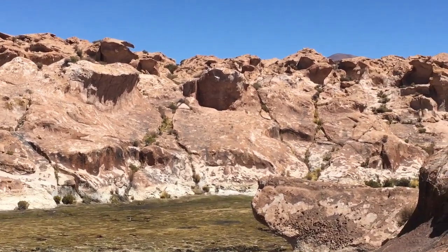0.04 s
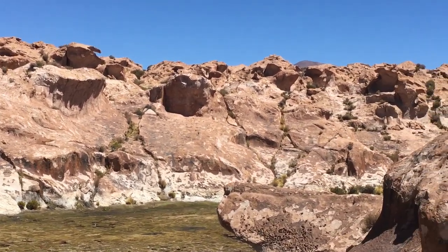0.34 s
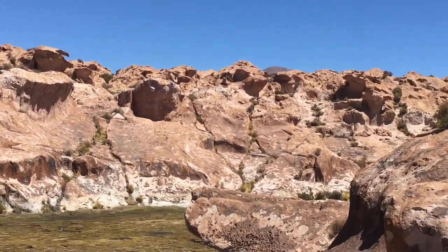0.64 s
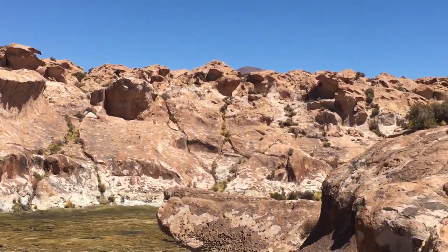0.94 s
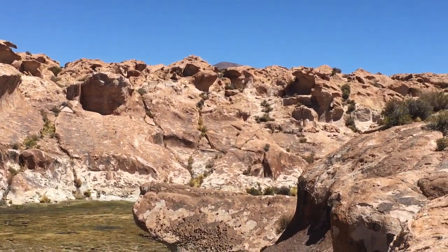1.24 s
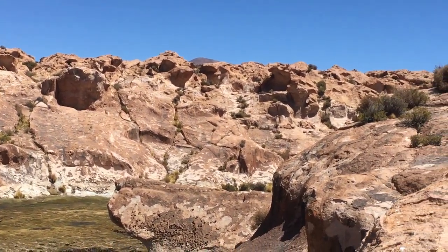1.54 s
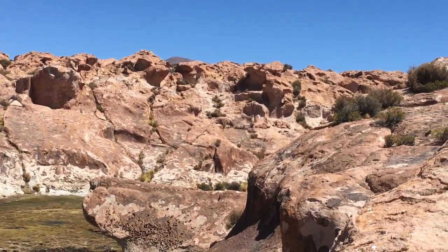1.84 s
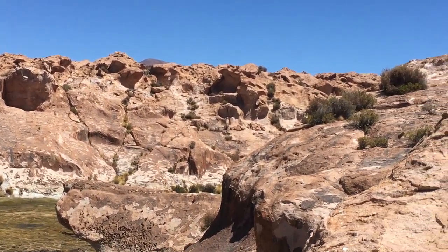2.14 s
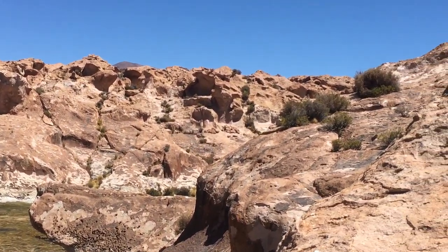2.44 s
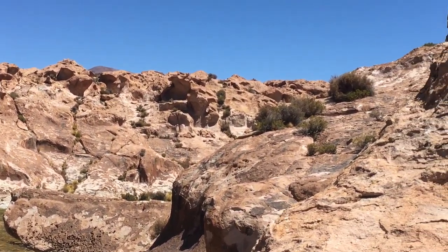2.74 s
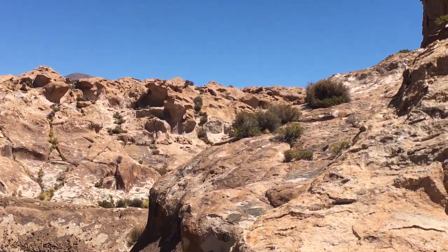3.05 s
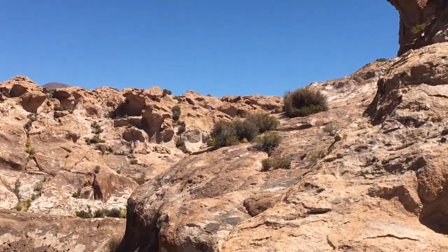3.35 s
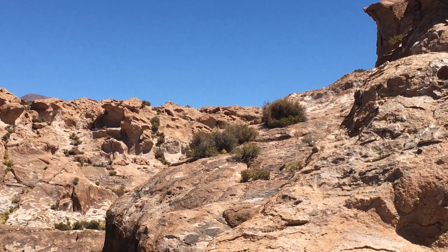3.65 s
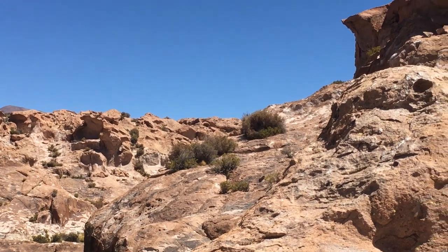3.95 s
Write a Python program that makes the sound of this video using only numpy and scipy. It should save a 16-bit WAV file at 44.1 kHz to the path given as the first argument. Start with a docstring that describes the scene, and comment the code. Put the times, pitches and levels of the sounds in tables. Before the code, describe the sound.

Gusty wind rumbles and flutters directly on the microphone for all four seconds, in rapid, uneven buffets. Harder hits rasp or crack around 0.9, 2, 2.7 and 3.9 seconds. A small, distant bird trills very faintly from 0.4 to 1.8 seconds, then chirps until 2.3. Two faint scuffs come in the first half second, and tiny grit ticks near 1 and 3.2 seconds, over soft hiss.

```python
"""An open rocky canyon, with gusty wind on a bare microphone.
The airflow rumbles and flutters; single eddies strike as short buffets, the hard ones with a
tearing rasp, and the flow cracks as it tears off the microphone port. Far off a small bird slurs,
trills and chips, scattered by the rock walls. Two faint scuffs and a few ticks of grit lie close by,
over an airy rustle, still air and microphone hiss."""
import sys
import numpy as np
from scipy import signal
from scipy.fft import rfft, irfft
from scipy.io import wavfile
from scipy.ndimage import uniform_filter1d

SR = 44100
rng = np.random.default_rng(int(sys.argv[2]) if len(sys.argv) > 2 else 0)


def file_out(sig):
    """Save sig as 16-bit WAV at sys.argv[1]."""
    # one column per channel
    cols = np.atleast_2d(sig).T
    # limit, then scale
    lim = np.clip(cols, -1, 1)
    pcm = np.round(lim * 32767).astype(np.int16)
    wavfile.write(sys.argv[1], SR, pcm)


N = 176400
T = np.arange(N) / SR


def wind(usual_db=-45, fray_growth=2.1):
    """Turbulence on the bare microphone: deep thump, fluttering body, a rasp that fast air raises."""
    # Airflow between buffets: t/s, rumble level/dB, flutter level/dB (levels before the trims below)
    airflow = [(0.0, -54, -62), (0.07, -36, -50), (0.2, -48, -50), (0.35, -40, -47), (0.45, -35, -52),
               (0.58, -46, -57), (0.7, -33, -47), (0.87, -30, -35), (0.94, -41, -55), (1.1, -33, -42),
               (1.25, -36, -48), (1.39, -38, -44), (1.49, -34, -43), (1.56, -32, -43), (1.68, -32, -38),
               (1.8, -38, -52), (1.92, -45, -34), (2.08, -55, -50), (2.38, -36, -46), (2.58, -40, -53),
               (2.7, -32, -47), (2.88, -37, -43), (2.99, -44, -56), (3.1, -34, -49), (3.24, -44, -54),
               (3.44, -36, -39), (3.53, -31, -42), (3.66, -35, -47), (3.86, -43, -52), (3.95, -29, -45),
               (4.0, -26, -37)]
    # Eddies that strike: peak t/s, nominal length/s, thump, body and rasp level/dB (before trims)
    buffets = [(0.123, 0.015, -39, -40, -58), (0.164, 0.012, -37, -37, -55), (0.2, 0.023, -30, -33, -59),
               (0.238, 0.014, -50, -34, -50), (0.296, 0.015, -27, -26, -46), (0.414, 0.027, -39, -31, -61),
               (0.489, 0.023, -46, -38, -62), (0.64, 0.012, -31, -35, -78), (0.672, 0.018, -30, -35, -69),
               (0.736, 0.019, -30, -24, -42), (0.756, 0.012, -27, -29, -59), (0.825, 0.017, -38, -31, -50),
               (0.86, 0.015, -41, -24, -34), (1.003, 0.019, -27, -28, -35), (1.039, 0.019, -35, -28, -50),
               (1.113, 0.017, -30, -29, -47), (1.159, 0.018, -25, -25, -42), (1.395, 0.019, -51, -39, -50),
               (1.47, 0.024, -27, -28, -47), (1.495, 0.016, -32, -27, -52), (1.63, 0.012, -39, -29, -42),
               (1.653, 0.012, -24, -36, -57), (1.694, 0.012, -23, -29, -42), (1.746, 0.013, -51, -33, -50),
               (1.885, 0.018, -28, -31, -45), (1.929, 0.012, -25, -29, -41), (1.979, 0.012, -46, -30, -53),
               (2.002, 0.02, -20, -21, -41), (2.053, 0.017, -27, -40, -59), (2.125, 0.017, -33, -33, -45),
               (2.184, 0.022, -33, -35, -51), (2.248, 0.025, -30, -31, -53), (2.32, 0.03, -26, -33, -48),
               (2.473, 0.021, -33, -27, -50), (2.528, 0.018, -39, -34, -40), (2.634, 0.012, -49, -29, -36),
               (2.657, 0.023, -30, -21, -29), (2.71, 0.015, -41, -26, -59), (2.804, 0.012, -30, -25, -38),
               (2.85, 0.024, -50, -23, -43), (2.937, 0.024, -31, -32, -52), (3.032, 0.018, -55, -38, -47),
               (3.083, 0.022, -51, -32, -51), (3.174, 0.03, -36, -31, -41), (3.203, 0.014, -53, -30, -39),
               (3.239, 0.033, -34, -27, -44), (3.258, 0.013, -25, -30, -49), (3.333, 0.015, -25, -23, -42),
               (3.4, 0.012, -29, -34, -52), (3.432, 0.012, -32, -32, -53), (3.505, 0.012, -22, -40, -51),
               (3.533, 0.012, -23, -35, -41), (3.592, 0.022, -39, -32, -52), (3.691, 0.023, -29, -31, -52),
               (3.794, 0.026, -30, -31, -44), (3.839, 0.021, -34, -28, -47), (3.901, 0.022, -27, -21, -37),
               (3.926, 0.02, -28, -28, -43), (3.95, 0.019, -25, -22, -31)]
    # Spectra of the three parts: f/Hz, relative level/dB
    thump_colour = [(15, -36), (25, -27.5), (40, -10.5), (52, -1), (65, 0.5), (85, -4), (115, -7),
                    (150, -12.5), (300, -59), (900, -120), (3000, -200)]
    body_colour = [(60, -29.5), (110, -8), (145, 3), (200, -1), (300, -8), (380, -15), (500, -29),
                   (800, -64), (1500, -110), (5000, -200)]
    rasp_colour = [(200, -21.5), (350, -3), (450, 1.5), (570, -1.5), (700, -10), (850, -19), (1100, -41),
                   (1600, -64), (3000, -110), (9000, -200)]
    rumble_db, flutter_db = curve(airflow)
    fray_db = usual_db + fray_growth * (flutter_db - usual_db)  # grows faster than the flutter
    swing = eddies()
    rumble = amp(rumble_db + 1 + 3.5 * swing)
    flutter = amp(flutter_db - 0.5 + 4 * swing)
    fray = amp(fray_db - 27.5 + 7.5 * swing)
    # Buffets add their power to the running flow; the higher the band, the shorter the blow.
    times, lengths, thump_db, body_db, rasp_db = np.transpose(buffets)
    thump = np.sqrt(rumble ** 2 + strikes(times, lengths * 1.265, thump_db + 3.5))
    body = np.sqrt(flutter ** 2 + strikes(times, lengths * 0.77, body_db - 0.5))
    rasp = np.sqrt(fray ** 2 + strikes(times, lengths * 0.49, rasp_db + 1))
    parts = (thump, thump_colour), (body, body_colour), (rasp, rasp_colour)
    return sum(level * noise(colour, passes=4) for level, colour in parts)


def eddies(corner_hz=32.4):
    """Quick random swings of the air speed, softly limited."""
    hz = np.fft.rfftfreq(N, 1 / SR)
    band = hz / (hz + corner_hz / 10) / (1 + (hz / corner_hz) ** 2)
    swing = unit(irfft(rfft(rng.standard_normal(N)) * band, N))
    return 2 * np.tanh(swing / 2)


def strikes(times, widths_s, levels_db):
    """Summed power of short blows of air, each a smooth swell and fall."""
    power = np.zeros(N)
    for s, width, db in zip(times, widths_s, levels_db):
        near = slice(max(0, int((s - 2 * width) * SR)), int((s + 2 * width) * SR))
        offset = (T[near] - s) / width
        swell = np.exp(-2 * offset ** 2) * np.cos(np.pi * offset / 4)
        power[near] += (amp(db) * swell) ** 2
    return power


def port_cracks(usual_width_s=0.0038, usual_db=-52.5, doubling_db=16):
    """The flow tears off the microphone port in brief cracks; a harder one lasts longer."""
    # Cracks: t/s, level/dB before the trim
    cracks = [(0.295, -57), (0.853, -46), (0.862, -50), (1.003, -45), (1.155, -54), (1.493, -58),
              (1.634, -57), (1.688, -57), (1.925, -49), (2.528, -54), (2.651, -39), (2.801, -55),
              (3.171, -57), (3.199, -50), (3.243, -55), (3.803, -56), (3.833, -55), (3.896, -47),
              (3.937, -57), (3.951, -44)]
    # Their spectrum: f/Hz, relative level/dB
    colour = [(250, -14), (450, 0), (700, -1), (950, -1.5), (1150, -11.5), (1400, -20.5), (2000, -36.5),
              (3000, -50), (9000, -120)]
    times, db = np.transpose(cracks)
    widths_s = usual_width_s * 2 ** ((db - usual_db) / doubling_db)
    return np.sqrt(strikes(times, widths_s, db + 2.5)) * noise(colour, passes=4)


def bird(trill_start_s=0.489, step_s=0.0619, chips=22, chip_s=0.014, fall=0.09):
    """A small bird far off: slurred notes and a rising trill of falling chips."""
    # Slurs: t/s, length/s, start, middle and end f/Hz, level/dB
    notes = [(.376, .045, 4450, 5050, 4900, -79), (.41, .06, 4950, 4800, 4600, -77),
             (.455, .08, 3650, 3450, 3000, -84), (1.914, .026, 8200, 7200, 6300, -79),
             (1.927, .022, 8100, 7200, 6300, -78), (2.19, .045, 5030, 4930, 4800, -83),
             (2.245, .042, 4800, 4660, 4480, -80)]
    # Course of the trill: t/s, f/Hz, level/dB
    trill = [(.5, 3050, -83), (.62, 3150, -82), (.87, 3400, -84), (1, 3650, -79), (1.06, 3850, -78),
             (1.3, 3950, -83), (1.6, 3900, -82), (1.74, 4000, -77), (1.8, 4000, -79)]
    song = np.zeros(N)
    for s, *note in notes:
        add(song, s, whistle(*note))
    times, pitch, level = np.transpose(trill)
    for s in trill_start_s + step_s * np.arange(chips):
        hz = np.interp(s, times, pitch)
        db = np.interp(s, times, level)
        add(song, s, whistle(chip_s, hz * (1 + fall), hz, hz * (1 - fall), db))
    return song


def whistle(length_s, start_hz, middle_hz, end_hz, db, waver_share=0.009, waver_s=0.002):
    """One gliding, slightly unsteady bird note."""
    u = np.linspace(0, 1, int(length_s * SR))
    waver = unit(uniform_filter1d(rng.standard_normal(N // 20), int(waver_s * SR)))[:len(u)]
    glide = np.polyval(np.polyfit([0, .5, 1], [start_hz, middle_hz, end_hz], 2), u)
    hz = glide * (1 + waver_share * waver)
    envelope = amp(db) * np.sqrt(2) * np.sin(np.pi * u)
    return envelope * np.sin(2 * np.pi * np.cumsum(hz) / SR)


def rock_walls(sound, echo_db=-7.5, t60_s=0.5):
    """The direct sound plus the diffuse tail that the canyon walls scatter back."""
    tail = rng.standard_normal(SR) * np.exp(-np.log(1000) * T[:SR] / t60_s)
    return sound + amp(echo_db) * signal.fftconvolve(sound, tail / np.linalg.norm(tail))[:N]


def scuffs_and_grit():
    """Friction close to the microphone: soft scuffs and small, sharp ticks of grit."""
    # Onsets: t/s, level/dB
    scuffs = [(.002, -63.5), (.392, -65.5)]
    ticks = [(.971, -71), (1.184, -74), (3.198, -69)]
    # Their spectra: f/Hz, relative level/dB
    scuff_colour = [(300, -10.5), (1100, -12.5), (2000, -14), (2850, -17), (3300, -26), (6000, -27),
                    (12000, -38)]
    tick_colour = [(400, 0), (1200, 0.5), (3500, 1), (6000, -10), (9000, -16)]
    return rubs(scuffs, scuff_colour, rise_s=0.013) + rubs(ticks, tick_colour, rise_s=0.0015)


def rubs(events, colour, rise_s):
    """Short bursts of friction noise that swell for rise_s and die away."""
    ages = [(np.maximum(T - s, 0) / rise_s, db) for s, db in events]
    return noise(colour) * sum(amp(db) * age * np.exp(1 - age) for age, db in ages)


def ambience(air_db=-75):
    """Steady still air and microphone hiss, with a faint rustle that comes and goes all around."""
    # Spectra of the air with the hiss, and of the rustle: f/Hz, relative level/dB
    air_colour = [(100, 4.5), (600, 6), (1200, -1), (2000, -3), (3300, -3), (4300, -3.5), (4950, -7),
                  (5600, -2.5), (6800, -3), (7800, -5.5), (9300, -2), (10500, -6), (11600, -1.5),
                  (15500, -1.5)]
    rustle_colour = [(400, -5.5), (1200, -1), (2500, -5), (3500, -7), (4500, -14.5), (12000, -35.5)]
    # Course of the rustle: t/s, level/dB
    rustle_level = [(0, -79.5), (.6, -81.5), (.73, -81), (.95, -87.5), (1.2, -84), (1.48, -80), (1.75, -81),
                    (1.9, -83.5), (2.2, -86.5), (2.45, -80), (2.8, -88), (3.2, -81), (3.7, -88.5), (4, -85)]
    air = amp(air_db) * noise(air_colour)
    rustle = amp(curve(rustle_level)[0]) * noise(rustle_colour)
    return air + rustle


def noise(colour, passes=0):
    """Coloured noise at rms 1; each pass evens out its loudness and keeps its colour."""
    hz, db = np.transpose(colour)
    gain = amp(np.interp(np.log(np.fft.rfftfreq(N, 1 / SR) + 1), np.log(hz), db))
    x = irfft(gain * rfft(rng.standard_normal(N)), N)
    for _ in range(passes):
        even = np.cos(np.angle(signal.hilbert(x)))
        x = irfft(gain * np.exp(1j * np.angle(rfft(even))), N)
    return unit(x)


def amp(db):
    """Decibels to gain."""
    return 10 ** (np.asarray(db) / 20)


def unit(x):
    """Scales to rms 1."""
    return x / np.sqrt(np.mean(x ** 2) + 1e-20)


def curve(points):
    """Each column of a timed table at every sample."""
    times, *columns = np.transpose(points)
    return [np.interp(T, times, column) for column in columns]


def add(mix, s, sound):
    """Mixes a sound in at time s."""
    part = mix[max(0, round(s * SR)):][:len(sound)]
    part += sound[:len(part)]


def scene():
    """One microphone: wind right on it, everything else faint behind."""
    near = scuffs_and_grit()
    background = ambience()
    return (wind() + port_cracks() + rock_walls(bird()) + near + background)[None]


def record(dry, low_cut_hz=43, edge_hz=15780):
    """The recorder's low cut and band limit."""
    dry = signal.sosfilt(signal.butter(2, low_cut_hz, "highpass", fs=SR, output="sos"), dry)
    taps = signal.firwin(511, edge_hz, window=("kaiser", 9), fs=SR)
    padded = np.pad(dry, ((0, 0), (len(taps) // 2,) * 2), "reflect", reflect_type="odd")
    return signal.oaconvolve(padded, taps[None], "valid")


dry = scene()
out = record(dry)
file_out(out)
```